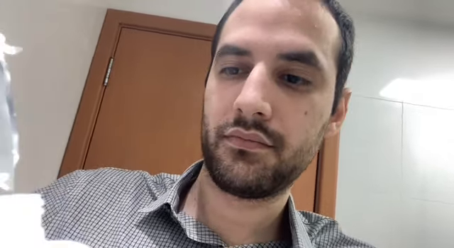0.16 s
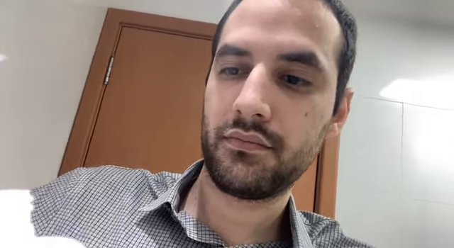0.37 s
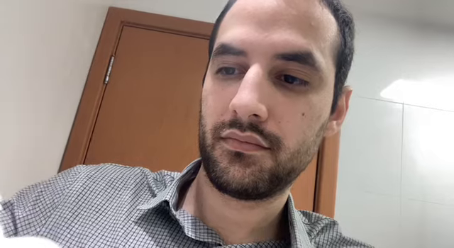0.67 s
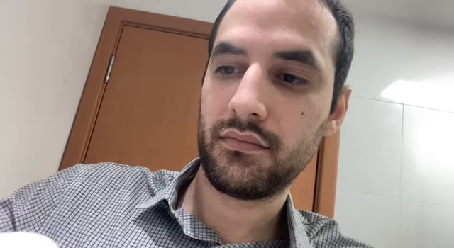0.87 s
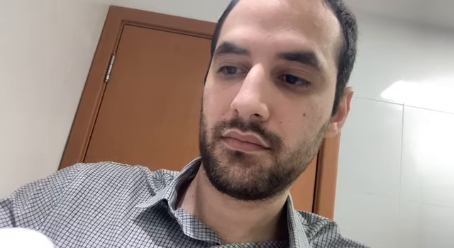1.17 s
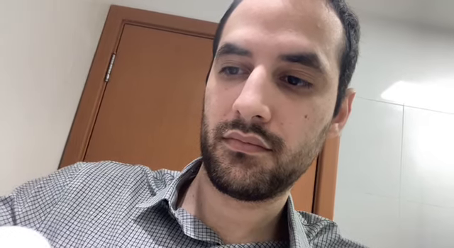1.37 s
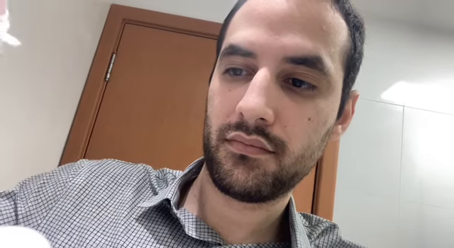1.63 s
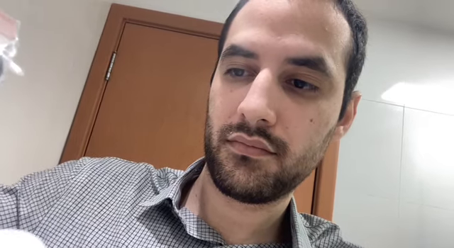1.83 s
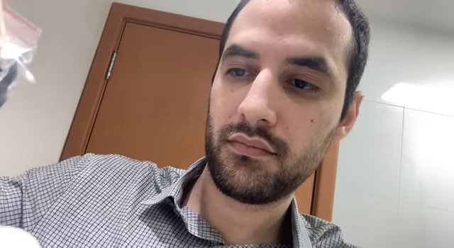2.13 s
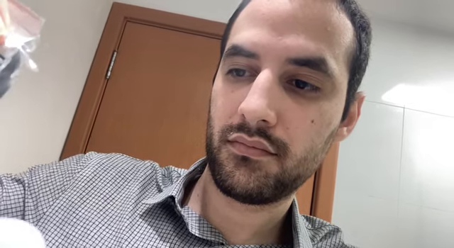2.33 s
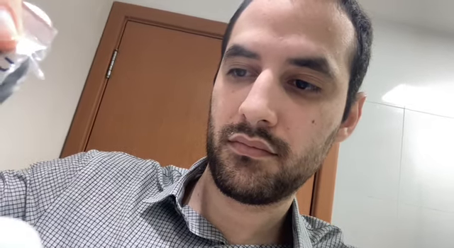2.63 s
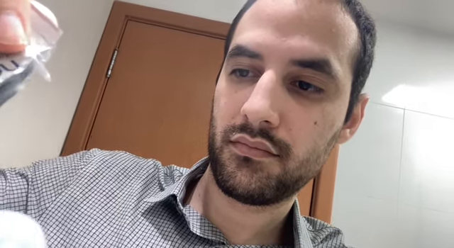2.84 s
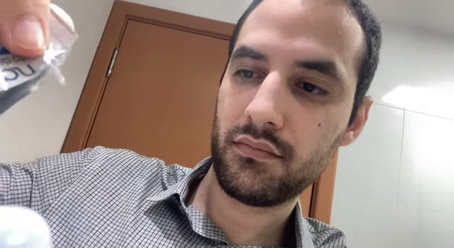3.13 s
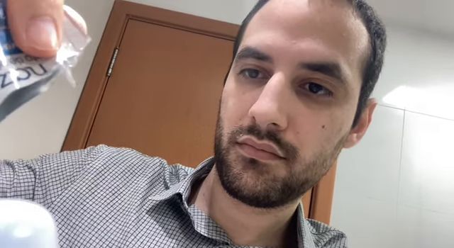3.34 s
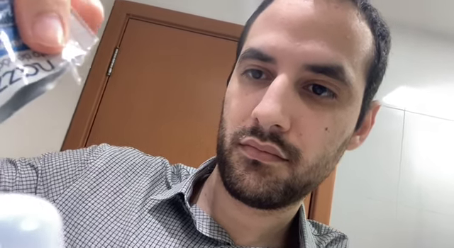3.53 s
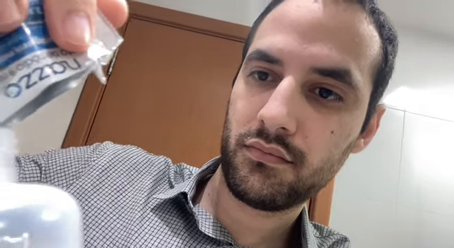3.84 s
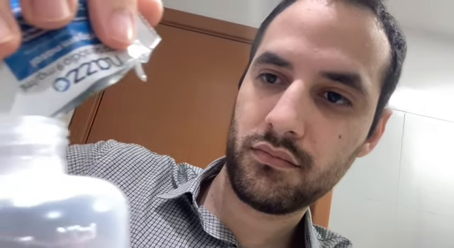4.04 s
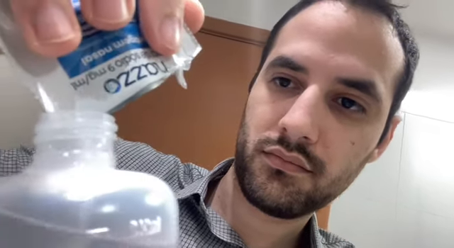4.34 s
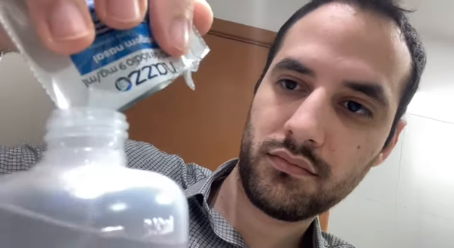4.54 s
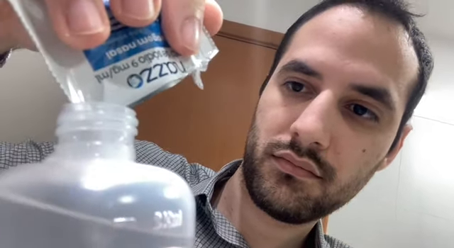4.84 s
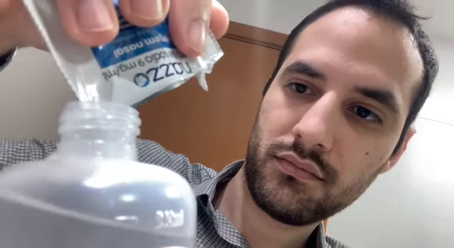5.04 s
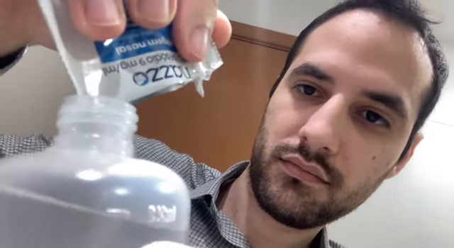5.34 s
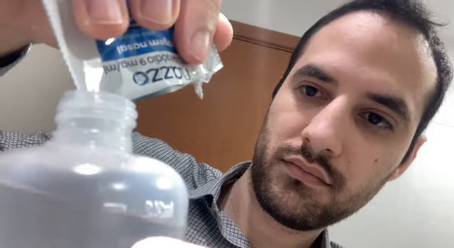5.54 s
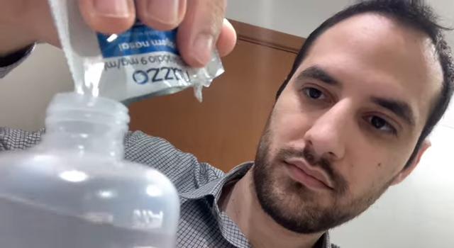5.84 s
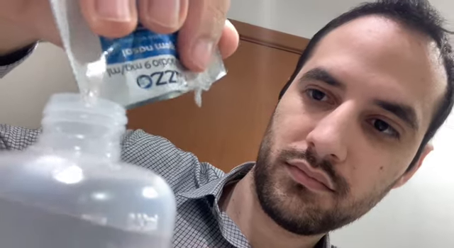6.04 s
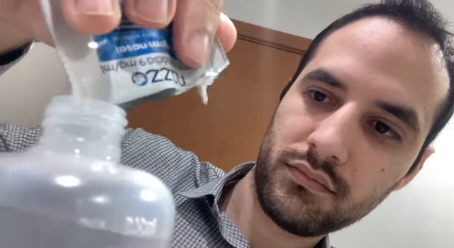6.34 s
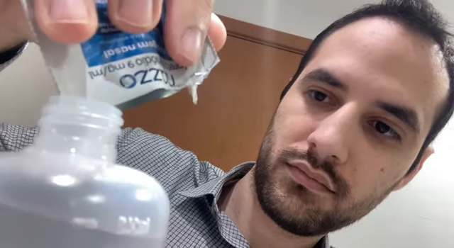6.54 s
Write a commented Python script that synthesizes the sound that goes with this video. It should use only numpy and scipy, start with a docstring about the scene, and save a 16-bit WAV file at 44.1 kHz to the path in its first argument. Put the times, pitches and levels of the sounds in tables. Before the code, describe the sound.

A close, quiet stereo scene in a small hard-walled tiled room, with a faint steady noise floor and a hand-held microphone. From 0 s, a sleeve hisses in soft strokes and the grip gives low, muffled rumbles. At about 0.65 s a foil crease clicks clearly with a short hollow bottle ring, followed by light crinkling until about 1.3 s. Then come sparse tiny ticks, with stronger low handling bumps and cloth swishes near 2.1 s. Two crisp metallic foil snaps sound at 3.05 and 3.15 s, the second brighter and stronger. From 3.3 to 6 s there is mostly sleeve rustle, finger rubbing, a low bump and faint bottle touches near 4.2 s, and small ticks. At 6.08 s the loudest sharp snap bursts out, then crackling squeezes, dull thumps and patter at 6.16 and 6.27 s, a hollow bottle knock, a last smaller crackle at 6.42 s, and short ringing reflections.

```python
"""Close to a hand-held microphone in a small tiled room, a foil sachet is squeezed over a plastic bottle.
From the start a noise floor lies under a sleeve's hiss and the soft rumble of the hand on the housing.
Foil creases soon tick as swinging modes, then drops ring the bottle's air, the slack walls patter and the
foil crinkles as showers of tiny rings; dull thumps follow. Sharp snaps come at 3 s, the loudest just after
6 s amid hard squeezes. Scattered echoes, a decaying tail and narrow resonances place it in the room."""
import sys
import numpy as np
from scipy import signal
from scipy.fft import rfft, irfft
from scipy.io import wavfile
from scipy.ndimage import uniform_filter1d, map_coordinates

SR = 44100
rng = np.random.default_rng(int(sys.argv[2]) if len(sys.argv) > 2 else 0)


def file_out(sig):
    """Save sig as 16-bit WAV at sys.argv[1]."""
    # one column per channel
    cols = np.atleast_2d(sig).T
    # limit, then scale
    lim = np.clip(cols, -1, 1)
    pcm = np.round(lim * 32767).astype(np.int16)
    wavfile.write(sys.argv[1], SR, pcm)


N = 295536
TIME = np.arange(N) / SR

# Strokes of the sleeve. Each row: peak in seconds, rise in s, fall in s, swish level in dB.
ARM_STROKES = [(.06, 0.093, 0.27, -62), (.22, .1, .13, -58), (.68, 0.19, 0.13, -58),
               (.85, 0.071, 0.18, -70.5), (1.26, 0.047, 0.05, -76), (2.06, 0.14, .1, -55),
               (2.15, 0.1, .14, -61.5), (2.75, 0.1, .2, -65), (2.87, 0.11, 0.23, -59.5),
               (3.19, 0.07, 0.39, -65.5), (3.34, 0.08, 0.19, -59), (3.57, 0.12, 0.066, -61.5),
               (3.66, 0.15, 0.17, -59.5), (3.92, 0.1, 0.22, -68.5), (4.2, .105, 0.37, -58.5),
               (4.55, 0.19, 0.15, -61.5), (4.7, 0.35, 0.23, -65.5), (5.16, 0.29, .14, -63),
               (5.36, 0.24, 0.27, -67)]
# The arm swings to the right. Each row: time in seconds, dB taken from left and given to right, left lag in ms.
ARM_SIDE = [(0, 1.5, -.01), (3.7, 1, 0.013), (4.15, 3.5, 0.11), (5.4, 3, 0.16)]
# Colour of the cloth's hiss. Each row: frequency in Hz, relative density in dB per Hz.
CLOTH_COLOUR = [(700, -3.5), (1400, -19.5), (2300, -5), (3200, -1), (4200, 4), (6000, -0.5), (8000, 2.5),
                (9800, 7), (11000, 0.5), (11800, -13), (14000, -10)]
# Left-right likeness of the hiss. Each row: frequency in Hz, likeness from 0 to 1.
CLOTH_LIKENESS = [(1000, 0.43), (2500, 0.39), (4300, 0.18), (6000, 0.088)]
# The grip shifts and nudges the housing. Each row: peak in seconds, rumble level in dB.
GRIP_NUDGES = [(.14, -53.5), (.57, -60.5), (.69, -55), (.78, -55), (.99, -59.5), (1.15, -58.5), (1.27, -55),
               (1.347, -51), (1.57, -56), (1.689, -56.5), (1.831, -56), (1.92, -54.5), (2.11, -49.5),
               (2.189, -49), (2.41, -54), (3.648, -59), (3.77, -60.5), (4.21, -49.5), (4.3, -53),
               (4.46, -63), (5.04, -51.5), (5.49, -60), (5.76, -55), (5.869, -57), (6.1, -53),
               (6.29, -58.5), (6.471, -62.5)]
# Fingers slide on the housing. Each row: peak in seconds, half length in s, rubbing level in dB before the lift.
FINGER_SLIDES = [(0.161, 0.068, -65), (0.69, 0.64, -66.5), (1.313, 0.089, -67.5), (3.666, 0.22, -68.5),
                 (3.984, 0.077, -62), (4.247, 0.18, -62), (4.534, 0.15, -63), (4.857, 0.095, -60.5),
                 (5.137, 0.24, -58.5), (5.435, 0.32, -59), (6.103, 0.13, -59.5), (6.272, 0.027, -51),
                 (6.457, 0.14, -61.5)]
# Low modes of the held housing. Each row: frequency in Hz, width in Hz, relative level in dB.
HOUSING_MODES = [(69, 16, 3.5), (144.1, 17, -9.5)]
# Colour of skin on the housing. Each row: frequency in Hz, relative density in dB per Hz.
SKIN_COLOUR = [(90, 6), (145, 11), (215, -4), (280, 3), (400, -10), (520, -10.5), (680, -30), (1000, -34.5),
               (1600, -56)]
# Foil creases that buckle. Each row: start in seconds, flip length in ms, low mode in Hz, its level in dB,
# middle mode in Hz, its dB, high mode in Hz, its dB, treble crack in dB, knock of the body in dB.
CREASE_SNAPS = [(.148, 1.2, 1490, -87, 2420, -76, 3600, -81, -61, -83),
                (0.4683, 0.89, 2580, -85, 3600, -96, 4730, -90, -71, -85),
                (0.6548, 1.9, 1960, -50, 2770, -47.5, 4340, -55.5, -58, -75),
                (0.7627, 1.3, 1900, -71, 2480, -72, 3680, -77, -74, -76),
                (0.7693, 1.1, 1750, -69, 2360, -65, 3850, -73, -73, -71),
                (0.8433, 0.74, 2300, -61.5, 3050, -65, 4350, -63, -59.5, -76),
                (0.97, 1.4, 1990, -74, 2560, -74, 4100, -70, -83, -80),
                (0.9924, 1.8, 2200, -72, 2630, -75, 3740, -74, -78, -84),
                (1.1378, 1.4, 2300, -82, 3200, -78, 4000, -77, -76, -78),
                (1.1507, 0.89, 2190, -78, 3120, -78, 3880, -77, -69, -85),
                (1.1671, 1.7, 2190, -74, 2900, -76, 3750, -68, -75, -76),
                (1.181, 1.5, 2100, -74, 2880, -78, 3730, -69, -66.5, -81),
                (1.2246, 0.86, 2160, -75, 2620, -73, 4020, -79, -75, -90),
                (1.3926, 0.69, 2950, -82, 3850, -84, 4750, -87, -69, -86),
                (1.403, 1, 2500, -78, 3300, -90, 4300, -68.5, -77, -94),
                (1.4436, 0.82, 2830, -78, 4100, -80, 5170, -73, -83, -91),
                (1.5484, 1.5, 1940, -81, 2690, -89, 3860, -82, -86, -99),
                (1.8249, 1.3, 1560, -82, 3260, -69, 4030, -67, -74, -65.5),
                (2.5192, 0.67, 1900, -76, 4200, -60, 5440, -64, -64, -80),
                (2.7164, 0.99, 2340, -82, 3500, -67, 4600, -70, -64.5, -77),
                (2.826, 1.6, 2430, -69, 3220, -75, 4370, -67, -57.5, -66),
                (2.8361, 2, 880, -72, 2060, -58.5, 2920, -62, -73, -56.5),
                (3.0441, 1.13, 1910, -49.5, 2600, -48.5, 3180, -40, -70, -74),
                (3.1447, 1.44, 2390, -38.5, 3700, -40, 4350, -41, -53, -58.5),
                (4.331, 0.74, 2100, -75, 2970, -76, 4100, -71, -76, -84),
                (4.852, 1.4, 1500, -77, 2260, -83, 3760, -79, -78, -75),
                (5.548, .8, 2600, -82, 4000, -85, 5200, -82, -67, -90),
                (5.3734, 2.1, 2310, -71.5, 3710, -83, 5160, -86, -58, -94),
                (5.4903, 0.88, 2425, -67.5, 3830, -64, 4870, -63, -65, -85),
                (5.9354, 1.3, 2400, -73, 3490, -78, 4940, -68.5, -67.5, -85),
                (6.043, 0.68, 2030, -81, 3405, -67, 4780, -61, -65, -71),
                (6.0772, 1.13, 3247, -19, 3730, -26.5, 5090, -22.5, -29, -42),
                (6.0835, 0.86, 1556, -61, 2416, -48, 3940, -40, -54, -52),
                (6.1581, 1.9, 2370, -33.5, 3170, -30.5, 3760, -30, -40.5, -39.5),
                (6.1631, 1.6, 1524, -62, 2370, -52, 3120, -58, -64, -56),
                (6.2637, 1.5, 1720, -53, 3510, -37, 5070, -44, -56, -48.5),
                (6.2739, 1.3, 1420, -56, 2200, -50, 3680, -50, -53.5, -43),
                (6.4238, 1.86, 2018, -59, 3150, -51.5, 3920, -53, -73, -53),
                (6.654, 1.9, 2225, -82, 3300, -74.5, 4020, -79, -85, -83)]
# The sachet moves across in front of the microphone. Each row: time in seconds, left lag in ms.
SACHET_PLACE = [(0, -0.058), (3.5, -0.14), (4.2, 0.0028), (6.7, 0.15)]
# Hollow body of sachet and bottle. Each row: frequency in Hz, width in Hz, relative level in dB.
HOLLOW_MODES = [(182.3, 90, -4), (380, 150, 4), (559.4, 120, 3.5), (713, 75, 11), (837, 130, 6.5),
                (1060, 170, 2.5), (1640, 180, -2)]
# Drops and light touches on the bottle. Each row: start in seconds, ring level in dB before the lift,
# pitch in Hz, rise in s, 60 dB decay in s, scrape in dB relative to the ring.
BOTTLE_DROPS = [(0.671, -52, 806, 0.0027, 0.054, -24), (0.76, -75, 870, .004, 0.071, -11),
                (1.31, -68.5, 825, 0.0069, 0.067, -12), (1.825, -63.5, 840, 0.0022, 0.051, -20),
                (2.168, -55, 800, 0.0066, 0.073, -35), (4.188, -67.5, 800, 0.0021, 0.043, -27),
                (4.283, -58, 790, 0.0023, 0.035, -29), (6.275, -42.5, 820, 0.0006, 0.033, -23)]
# The slack walls crumple. Each row: peak in seconds, rise in s, fall in s, level in dB.
WALL_CRUMPLES = [(.77, 0.069, 0.089, -70.5), (2.19, 0.053, 0.046, -75.5), (6.17, 0.13, 0.27, -55),
                 (6.428, 0.029, 0.061, -60)]
# Fingers squeeze the foil. Each row: peak in seconds, rise in s, fall in s, level in dB before the trim,
# resonance of the sheet in Hz.
FOIL_SQUEEZES = [(0.779, 0.032, .03, -52, 2150), (0.874, 0.11, .07, -58, 2600),
                 (.96, 0.072, .07, -63.5, 2530), (1.111, 0.038, .07, -60, 2340),
                 (1.302, 0.11, .04, -72.5, 2280), (3.2, .03, 0.17, -58, 2200),
                 (6.097, 0.013, .04, -41.5, 3550), (6.271, 0.026, .025, -42.5, 3400),
                 (6.426, 0.012, .014, -53.5, 3250)]
# Treble band of the crinkling foil: lower and upper edge in Hz.
FOIL_TREBLE_HZ = (6500, 10500)
# The sachet's wall gives way. Each row: start in seconds, pitch in Hz, level in dB.
WALL_THUMPS = [(1.176, 380, -63), (3.145, 503, -55), (6.078, 220, -47.5), (6.159, 375, -40),
               (6.273, 183, -44)]
# Sachet sound sent into the room as it is moved and turned. Each row: time in seconds, gain in dB.
ROOM_SHARE = [(.7, 0), (2.5, 1.5), (3.1, -1.5), (6.07, 1), (6.45, -2)]
# Decay of the tiled room. Each row: frequency in Hz, 60 dB decay in seconds.
ROOM_DECAY = [(150, 0.94), (700, 0.62), (1500, 0.07), (3500, 0.43), (8000, 0.4), (11000, 0.15)]
# Strength of the room's tail. Each row: frequency in Hz, gain in dB.
ROOM_GAIN = [(150, -10), (700, -2), (1500, -4.5), (2400, -7.5), (3400, -7), (5000, -12), (9000, -3.5)]
# Resonances that linger between the tiles. Each row: frequency in Hz, width in Hz, gain in dB.
TILE_MODES = [(747, 8.6, 0.5), (787, 16, 7), (2560, 5, 3), (2853, 5, -1), (2920, 4, 2), (3060, 4.4, 5.5),
              (3174, 5.2, 9), (3350, 4.3, 5.5), (3640, 5, 2.5), (4030, 5.1, 14), (4450, 4.4, 2),
              (4740, 5.3, 1)]
# Colour of the steady noise floor. Each row: frequency in Hz, relative density in dB per Hz.
FLOOR_COLOUR = [(30, 5), (70, 8), (150, 2.5), (300, -5), (600, -5.5), (1200, -14.5), (2500, -18.5),
                (4500, -22.5), (8500, -24), (10300, -19.5), (11500, -27.5), (14000, -30.5)]
# Left-right likeness of floor and rubbing. Each row: frequency in Hz, likeness from 0 to 1.
NOISE_LIKENESS = [(60, 1), (150, 0.78), (400, 0.77), (1000, 0.049), (3000, 0.15), (9000, 0.083)]
# Stereo width of the recorder. Each row: frequency in Hz, width from 0 (one shared signal) to 1 (full).
STEREO_WIDTH = [(4000, 0.94), (4900, 0.39), (6000, .3), (7400, .5), (8300, .03), (9400, .03),
                (10200, 0.436), (10900, 0.011)]
# Treble phase between the channels. Each row: frequency in Hz, radians by which the left leads.
TREBLE_PHASE = [(4300, 0), (4700, .9), (5400, 2.55), (6100, 2.8), (6400, 3.55), (7100, 3.9), (7900, 6.1),
                (9300, 6.3), (10000, 7.7), (10700, 9.1), (12300, 9.2)]

FLOOR_DB = -74.5
CUTOFF_HZ = 12150
SWELL_DB = 20  # drop from a gesture's peak over its rise time or fall time


def from_db(db):
    """Decibels to gain."""
    return 10 ** (np.asarray(db) / 20)


def rms_one(x):
    """Scale to rms 1."""
    return x / np.sqrt(np.mean(x ** 2) + 1e-20)


def in_time(rows):
    """Interpolate the columns of a time curve at every sample."""
    s, *columns = np.transpose(rows)
    return [np.interp(TIME, s, column) for column in columns]


def at_hz(points, hz):
    """Read a spectrum on a log-frequency axis."""
    table_hz, values = np.transpose(points)
    return np.interp(np.log(hz), np.log(table_hz), values)


def drift(rate):
    """Random curve through knots of spread 1, `rate` of them per second."""
    knots = rng.standard_normal(int(rate * N / SR) + 2)
    return np.interp(TIME * rate, np.arange(len(knots)), knots)


def band(x, low_hz, high_hz):
    """Butterworth band-pass."""
    edges = [low_hz, min(high_hz, SR / 2 - 1)]
    return signal.sosfilt(signal.butter(2, edges, "band", fs=SR, output="sos"), x)


def resonate(x, hz, width):
    """A two-pole resonance, its width in Hz, with a gain near 1 at its peak."""
    r = np.exp(-np.pi * width / SR)
    zeros = np.array([1, 0, -1]) * (1 - r * r) / 2
    poles = [1, -2 * r * np.cos(2 * np.pi * hz / SR), r * r]
    return signal.lfilter(zeros, poles, x + 1e-18)


def coloured(spectrum, likeness=NOISE_LIKENESS):
    """Stereo noise of a given colour, more alike in both ears where the likeness is high; rms 1."""
    hz = np.fft.rfftfreq(N, 1 / SR) + 1
    mid, side = rfft(rng.standard_normal((2, N)))
    alike = np.clip(at_hz(likeness, hz), 0, 1)
    both = np.sqrt(1 + alike) * mid + np.sqrt(1 - alike) * side * [[1], [-1]]
    # roll off beyond the first and last frequency of the table
    ends = (1 + (spectrum[0][0] / hz) ** 2) * (1 + (hz / spectrum[-1][0]) ** 8)
    return rms_one(irfft(both * from_db(at_hz(spectrum, hz)) / ends, N))


def pan(x, db):
    """Take dB from the left and give it to the right."""
    return x * from_db([[-db], [db]])


def add(out, s, sound):
    """Mix a short sound in at time s."""
    at = max(int(s * SR), 0)
    out[:, at:at + sound.shape[-1]] += sound[..., :N - at]


def burst_level(x, db):
    """Scale a short sound so that its energy, spread over 5 ms, has this level."""
    return x * from_db(db) * np.sqrt(.005 * SR / np.sum(x ** 2))


def swell(peak_s, rise_s, fall_s, db, curve):
    """Power of one gesture that gathers speed, peaks and slows down."""
    away = np.maximum((peak_s - TIME) / rise_s, (TIME - peak_s) / fall_s)
    near, power = away < 3, np.zeros(N)
    power[near] = from_db(db - SWELL_DB * away[near] ** curve) ** 2
    return power


def gestures(rows, rest_db=-200, curve=1.44):
    """Gain of overlapping gestures over a resting level; curve 1 gives pointed tops, 2 round ones."""
    return np.sqrt(from_db(rest_db) ** 2 + sum(swell(*row, curve) for row in rows))


def flip(hz, length_s, rise_s):
    """A patch of foil swings for a few cycles and stops as it locks into its new shape."""
    t = TIME[:SR // 10]
    return np.sin(2 * np.pi * hz * t) * (1 - np.exp(-(t / rise_s) ** 2)) * np.exp(-(t / length_s) ** 3)


def random_clicks(per_s, spread_db):
    """Places of clicks scattered at random in time, and a random size for every sample."""
    sizes = from_db(spread_db * np.minimum(rng.exponential(1, N), 3))
    return (rng.random(N) < per_s / SR) * sizes


def sleeve(grain_db=0.25, flutter_db=2.0, ticks_per_s=45, ticks_db=-18.0):
    """Cloth slides with a fine-grained hiss that flutters as the folds catch; single threads snag with ticks."""
    side_db, lag_ms = in_time(ARM_SIDE)
    catch_db = grain_db * drift(600) + flutter_db * drift(60)
    snags = (rng.random(N) < ticks_per_s / SR) * rng.uniform(-1.2, 1, N)
    ticks = from_db(ticks_db) * rms_one(band(snags + 1e-18, 2400, 14000))
    cloth = coloured(CLOTH_COLOUR, CLOTH_LIKENESS) + ticks
    left, right = cloth * gestures(ARM_STROKES, curve=1.6)
    left = map_coordinates(left, [(TIME - lag_ms / 1000) * SR], order=3)
    return np.stack([left, right]) * from_db(catch_db + side_db * [[-1], [1]])


def hand(tremor_db=-68, swing_db=4, swings_per_s=7, rub_rest_db=-76.5, rub_follows=0.38,
         rub_lift_db=2.0, rough_db=3.0):
    """The grip shakes the housing's low modes and rubs on its shell, more so with every nudge and slide."""
    # the holding hand is never quite still
    rest_db = tremor_db + swing_db * drift(swings_per_s)
    nudges = [(s, 0.07, 0.068, db) for s, db in GRIP_NUDGES]  # rise and fall in s
    shake = gestures(nudges, rest_db, 1.3)
    # the rubbing follows a share of the rumble's swing in dB
    skin_db = rub_rest_db + rub_follows * (20 * np.log10(shake) - tremor_db)
    skin = gestures([(s, half_s, half_s, db) for s, half_s, db in FINGER_SLIDES], skin_db)
    tremor = rng.standard_normal(N) + 0.31 * rng.standard_normal((2, N))
    rumble = sum(from_db(db) * resonate(resonate(tremor, hz, width), hz, width)
                 for hz, width, db in HOUSING_MODES)
    # even out the level, so that the shake alone sets it
    rumble /= np.sqrt(uniform_filter1d(np.mean(rumble ** 2, axis=0), size=SR // 12) + 1e-12)
    rubbing = coloured(SKIN_COLOUR) * skin * from_db(rub_lift_db + rough_db * drift(30))
    return rumble * shake + rubbing


def snaps(rise_share=0.18, slip_s=0.00076, slip_share=0.067, crack_slip_share=0.16, pan_db=2.5):
    """A crease flips with a jolt and a scatter of slips; three foil modes swing and the hollow body rings."""
    out, t = np.zeros((2, N)), TIME[:SR // 10]
    for s, flip_ms, low_hz, low_db, mid_hz, mid_db, high_hz, high_db, crack_db, knock_db in CREASE_SNAPS:
        slips = rng.standard_normal(len(t)) * np.exp(-t / slip_s)
        jolt = (t == 0) + slip_share * slips
        flip_s = flip_ms / 1000
        sound = np.zeros(len(t))
        # neighbouring modes swing in opposite directions
        for sign, hz, db in [(1, low_hz, low_db), (-1, mid_hz, mid_db), (1, high_hz, high_db)]:
            swing = signal.fftconvolve(jolt, flip(hz, flip_s, rise_share * flip_s))[:len(t)]
            sound += sign * burst_level(swing, db)
        knock = sum((-1) ** k * from_db(db) * resonate(jolt, hz, width)
                    for k, (hz, width, db) in enumerate(HOLLOW_MODES))
        sound += burst_level(knock, knock_db)
        crack = burst_level(band((t == 0) + crack_slip_share * slips, 5900, 11500), crack_db)
        lag_s = np.interp(s, *np.transpose(SACHET_PLACE)) / 1000
        ears = np.stack([np.interp(t - lag_s, t, sound, left=0), sound])
        add(out, s, pan(ears, pan_db) + crack)
    return out


def drops(lift_db=5.0, waver=0.063, waver_per_s=180, splash=0.37, scrape_s=0.03):
    """Each drop or touch rings the bottle's air at an unsteady pitch, with a soft splash and a trailing scrape."""
    out, t = np.zeros((2, N)), TIME[:SR // 3]
    for s, db, hz, rise_s, t60, scrape_db in BOTTLE_DROPS:
        unsteady_hz = hz * (1 + waver * drift(waver_per_s)[:len(t)])
        phase = 2 * np.pi * np.cumsum(unsteady_hz) / SR
        tone = np.sin(phase + rng.uniform(0, 1, (2, 1)))
        wet = splash * rms_one(band(rng.standard_normal((2, len(t))), 550, 2250))
        scrape = rms_one(resonate(band(rng.standard_normal((2, len(t))), 550, 2000), hz, 110))
        ring = (tone + wet) * from_db(-60 * t / t60)
        trail = scrape * from_db(scrape_db - 20 * (t / scrape_s) ** 2)
        add(out, s, from_db(db + lift_db) * (1 - np.exp(-t / rise_s)) * (ring + trail))
    return out


def walls(per_s=900, spread_db=3.0, tilt_hz=900, pan_db=0.5):
    """The slack walls of the wet sachet crumple with a dull, dense patter."""
    strengths = rng.normal(rng.choice([-1, 1], N), 0.56, (2, N))
    clicks = random_clicks(per_s, spread_db) * strengths
    dull = signal.butter(1, tilt_hz, fs=SR, output="sos")
    patter = signal.sosfilt(dull, band(clicks + 1e-18, 310, 2300))
    return pan(rms_one(patter) * gestures(WALL_CRUMPLES), pan_db)


def crinkles(trim_db=-9, per_s=850, spread_db=2.0, width_hz=520, sheet_width_hz=600, sheet_db=1.5,
             treble_db=-9, pan_db=2.2):
    """Tiny creases give way at random under the fingers, each ringing at one of twelve pitches."""
    clicks = random_clicks(per_s, spread_db) * rng.choice([-1, 1], N)
    pitches = np.geomspace(1900, 4700, 12)
    dealt = rng.integers(0, len(pitches), N)
    rings = 0
    for k, hz in enumerate(pitches):
        ear_gains = rng.normal(1, 0.12, (2, 1))
        rings = rings + resonate(clicks * (dealt == k) * ear_gains, hz, width_hz)
    rings = rms_one(rings)
    treble = from_db(treble_db) * rms_one(band(clicks, *FOIL_TREBLE_HZ))
    out = 0
    for *gesture, sheet_hz in FOIL_SQUEEZES:
        # the whole sheet favours one broad resonance, which shifts with the grip
        favoured = rms_one(resonate(rings, sheet_hz, sheet_width_hz))
        sheet = rms_one(rings + from_db(sheet_db) * favoured)
        out = out + (sheet + treble) * gestures([gesture])
    return pan(out * from_db(trim_db), pan_db)


def thumps(cycles=1.7, rise_s=0.0016, pan_db=3.0):
    """The sachet's whole wall gives way with a dull thump, a low swing of a cycle or two."""
    out = np.zeros((2, N))
    for s, hz, db in WALL_THUMPS:
        add(out, s, burst_level(flip(hz, cycles / hz, rise_s), db))
    return pan(out, pan_db)


def near_echoes(x, level_db=-10, decay_s=0.005, first_s=0.00072, slap_s=0.0037, slap_db=-17):
    """Hand, bottle and chest scatter sound back within milliseconds; the nearest wall adds one distinct echo."""
    t = TIME[:SR // 25]
    scatter = rng.standard_normal((2, len(t))) * np.exp(-t / decay_s) * (t > first_s)
    scatter /= np.linalg.norm(scatter, axis=1, keepdims=True)
    slap = np.sinc((t - slap_s) * SR)
    echoes = from_db(level_db) * scatter + from_db(slap_db) * slap
    return signal.fftconvolve(x, echoes, axes=1)[:, :N]


def room(x, first_s=0.0023, build_s=0.0016, echoes_per_s=2200, thicken_s=.06):
    """Tiled walls answer with echoes that crowd together with time and die at a rate set band by band."""
    t, edges, tail = TIME[:SR], np.geomspace(100, 12800, 15), 0
    chance = np.clip(echoes_per_s * (1 + (t / thicken_s) ** 2) / SR, 0, 1)
    # two independent stereo sets, used in turn by neighbouring bands
    present = rng.random((2, len(t))) < chance
    echoes = rng.standard_normal((2, 2, len(t))) * present / np.sqrt(chance)
    for k, (low, high) in enumerate(zip(edges, edges[1:])):
        hz = np.sqrt(low * high)
        build = 1 - np.exp(-np.maximum(t - first_s, 0) / build_s)
        decay = from_db(-60 * t / at_hz(ROOM_DECAY, hz)) * build
        decay = decay / np.linalg.norm(decay)
        tail = tail + band(echoes[k % 2], low, high) * decay * from_db(at_hz(ROOM_GAIN, hz))
    return signal.fftconvolve(x, tail, axes=1)[:, :N]


def room_ring(x):
    """A few narrow resonances of the tiled room stand out; each reaches the two ears with its own delay."""
    mono, out = x.mean(axis=0), np.zeros((2, N))
    for hz, width_hz, db in TILE_MODES:
        ring = from_db(db) * resonate(mono, hz, width_hz)
        lags = rng.integers(SR // 500, SR // 100, 2)  # 2 to 10 ms
        out += np.stack([np.pad(ring, (lag, 0))[:N] for lag in lags])
    return out


def room_tone():
    """A steady coloured noise floor."""
    return from_db(FLOOR_DB) * coloured(FLOOR_COLOUR)


def scene():
    """Sachet and bottle in the room, over sleeve, hand and room tone."""
    sachet = snaps() + drops() + walls() + crinkles() + thumps()
    room_db, = in_time(ROOM_SHARE)
    radiated = sachet * from_db(room_db)
    echoes = near_echoes(sachet) + room(radiated) + room_ring(radiated)
    return sachet + echoes + sleeve() + hand() + room_tone()


def record(dry):
    """The stereo image narrows in the treble, where the channels also part in phase; the top is cut steeply."""
    hz = np.fft.rfftfreq(N, 1 / SR) + 1
    left, right = rfft(dry)
    width, sign = np.clip(at_hz(STEREO_WIDTH, hz), 0, 1), np.array([[1], [-1]])
    narrowed = (left + right + sign * width * (left - right)) / np.sqrt(2 + 2 * width ** 2)
    # each channel turns by half the phase, in opposite directions
    both = irfft(narrowed * np.exp(.5j * sign * at_hz(TREBLE_PHASE, hz)), N)
    return signal.sosfilt(signal.ellip(10, .3, 80, CUTOFF_HZ, fs=SR, output="sos"), both)


dry = scene()
out = record(dry)
file_out(out)
```